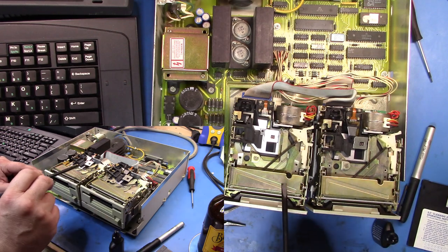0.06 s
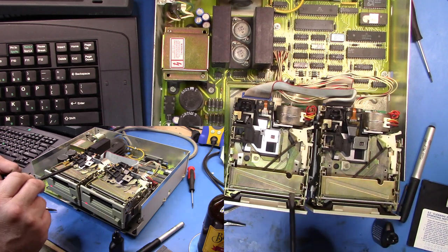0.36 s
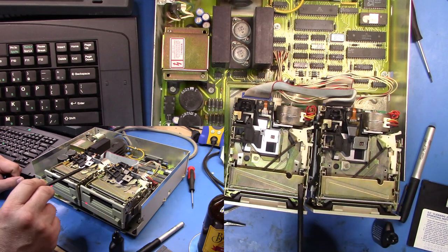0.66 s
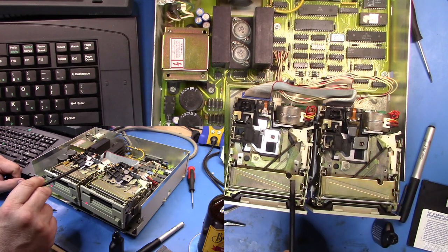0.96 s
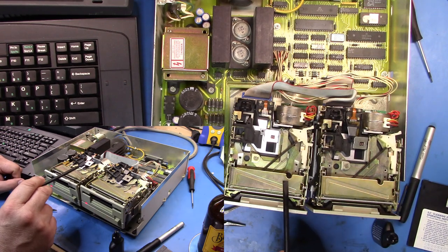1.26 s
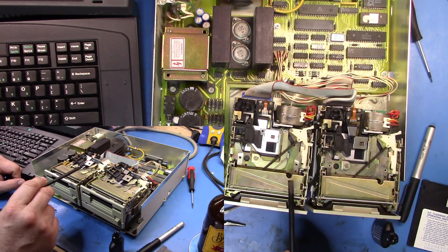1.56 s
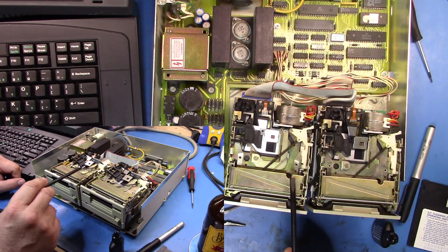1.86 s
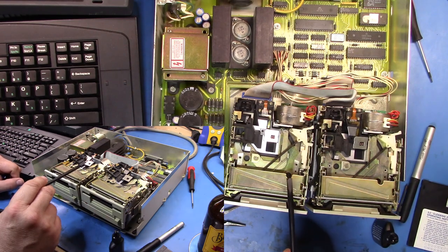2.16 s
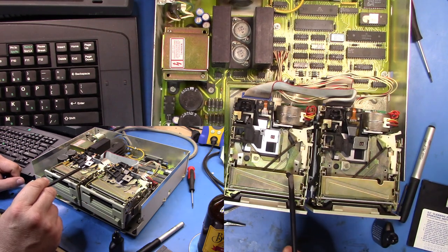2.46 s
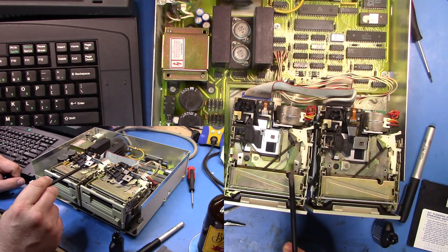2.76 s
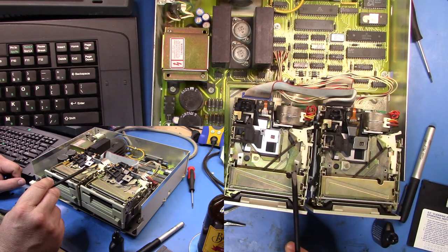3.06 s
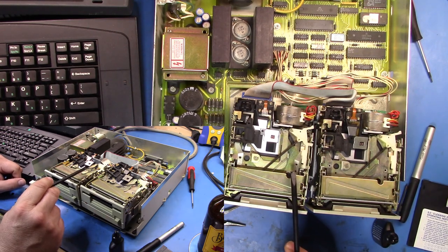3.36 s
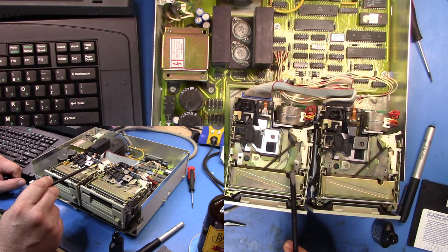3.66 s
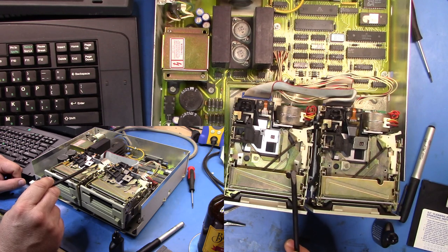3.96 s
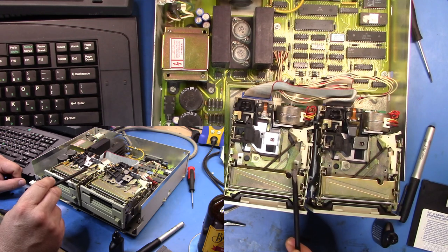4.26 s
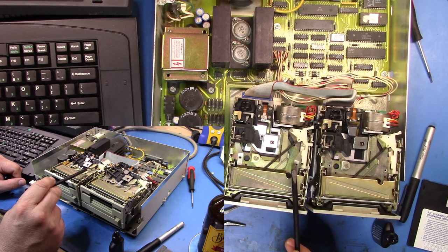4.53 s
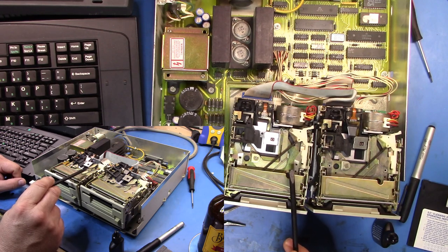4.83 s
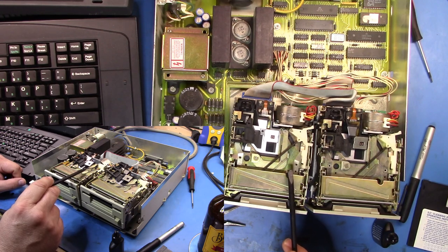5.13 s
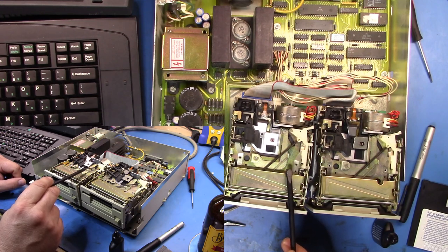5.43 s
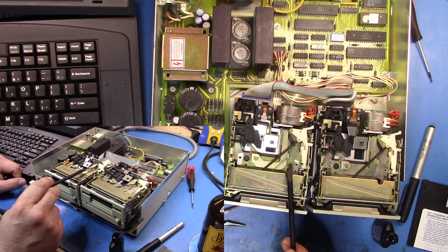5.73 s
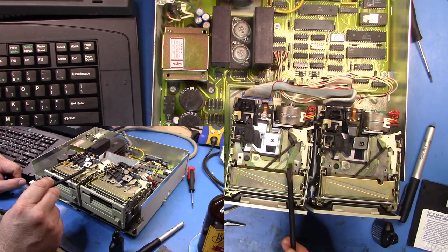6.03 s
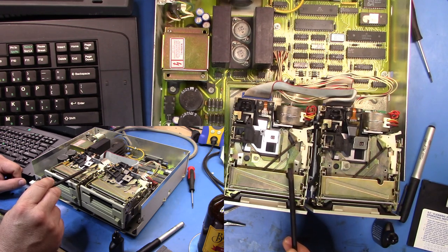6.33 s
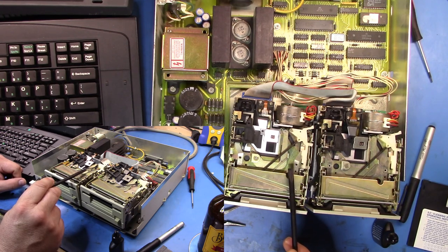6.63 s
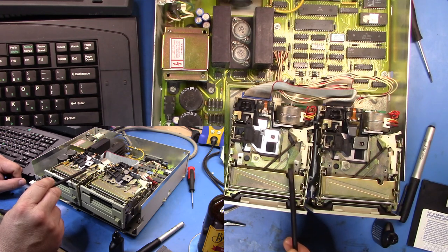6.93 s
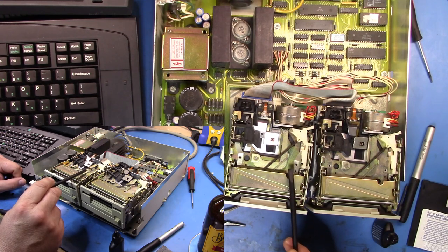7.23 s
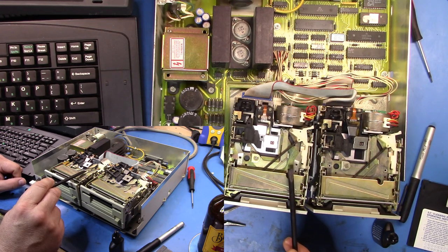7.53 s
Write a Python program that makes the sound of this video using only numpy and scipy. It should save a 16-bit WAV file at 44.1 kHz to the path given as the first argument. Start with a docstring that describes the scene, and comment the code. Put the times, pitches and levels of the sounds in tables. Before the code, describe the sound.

Two floppy drives whine, buzz and swish, stop with a sharp clack, then restart and scrape over a steady fan hum.

```python
"""Two floppy drives on a repair bench

Two open drives run side by side, stop for two seconds and start again. Their motors, a fraction of a
hertz apart, whine and beat while a belt buzzes. The first disk swishes in its sleeve once a turn; the
second scrapes when pressed. Head clamps clack shut and open over a droning case, a fan and mains hum."""
import sys
import numpy as np
from scipy import signal
from scipy.fft import rfft, irfft, next_fast_len
from scipy.io import wavfile
from scipy.ndimage import uniform_filter1d, map_coordinates

SR = 44100
rng = np.random.default_rng(int(sys.argv[2]) if len(sys.argv) > 2 else 0)


def to_wav(s):
    """Save 16-bit WAV."""
    ch = np.atleast_2d(s).T  # columns
    pcm = np.round(np.clip(ch, -1, 1) * 32767)  # PCM
    wavfile.write(sys.argv[1], SR, pcm.astype(np.int16))


N = 343539
T = np.arange(N) / SR
SIDE = np.array([[1], [-1]])  # adds on the left, subtracts on the right
BELT_RATIO, SPIN_UP_S = 4, .064  # shaft turns per disk turn; time to full speed


# The whine of motor A, motor B and the belt pulley. Each row: multiple of the turning rate
# (rounded when played), relative level in dB running free, the same under load.
WHINE_A = [(12, -59, -57), (15, -52.5, -47), (16, -55, -45), (17, -47.5, -39.5), (18, -45.5, -39),
           (21, -63.5, -67), (22, -60.5, -69), (23, -51.5, -47), (24, -54.5, -51), (27, -64.5, -63),
           (41, -58.5, -54)]
WHINE_B = [(5, -61.5, -60), (14, -70, -62.5), (15, -58, -69), (16, -74, -53.5), (17, -74, -61.5),
           (18, -55.5, -46.5), (22, -83, -55), (24, -71, -66), (30, -61, -54.5)]
PULLEY_WHINE = [(94, -69, -50), (154.7, -65.5, -70), (162.2, -69, -71)]

def motor_whine(hz_a, hz_b, load_a, load_b, spin, surge):
    """Two motors beat against each other; the chassis sings out briefly as they reach full speed."""
    whine = harmonics(hz_a, load_a, WHINE_A, flutter=0.0079)
    whine += harmonics(hz_b, load_b, WHINE_B, flutter=0.011)
    whine += harmonics(hz_a / BELT_RATIO, load_a, PULLEY_WHINE, flutter=0.0025)
    whine *= spin ** 6.1 * undb(-1.92 + 9 * surge)
    sing = sum(np.exp(-((T - on - SPIN_UP_S) / 0.0081) ** 2) for on, _ in RUNS)
    return whine + np.sqrt(2) * undb(-29) * sing * np.sin(2 * np.pi * 702 * T)


def harmonics(hz, load, orders, flutter):
    """The tones of one shaft: load shifts their balance and the belt makes them flutter."""
    angle = 2 * np.pi * np.cumsum(hz) / SR + flutter * walk(24)
    out = 0
    for multiple, free_db, loaded_db in orders:
        k = round(multiple)
        db = free_db + load * (loaded_db - free_db) + .55 * walk(15)
        # the chassis delays each harmonic differently, which smears the pulses into a drone
        out += np.sqrt(2) * undb(db) * np.sin(k * angle + 1.15 * k ** 2)
    return out


# Both motors switch together, already running at the start. Each row: on and off in seconds.
RUNS = [(-1, 1.44), (3.668, 9)]
# Motors A and B. Each row: free shaft rate in Hz, clamped rate in Hz, coasting time in seconds.
MOTORS = [(39.56, 39.18, .175), (39.991, 39.6787, .1763)]
# The head clamps. Each row: closing and opening in seconds, drive (0 is A, 1 is B).
CLAMPS = [(.25, 1.44, 0), (-1, 1.44, 1), (5.785, 9, 1)]

def shaft(drive):
    """A closed clamp slows its motor. Gives share of full speed, load (both 0-1) and shaft rate in Hz."""
    free_hz, loaded_hz, coast_s = MOTORS[drive]
    spin = sum(gate(on, off, SPIN_UP_S, coast_s) for on, off in RUNS)
    load = sum(gate(closes, opens, .02, .02) for closes, opens, which in CLAMPS if which == drive)
    return spin, load, spin * (free_hz + load * (loaded_hz - free_hz))


# Belt and bearings, heard through the chassis. Each row: frequency in Hz, relative dB per Hz.
BELT_BUZZ = [(50, -115), (440, -93.5), (570, -79.5), (685, -78.5), (770, -86.5), (910, -76), (1020, -85),
             (1280, -91.5), (1420, -79), (1520, -88), (1660, -81.5), (2000, -92), (2500, -99), (5000, -115)]

def belt_buzz(turns, load_a, load_b, press, spin, surge):
    """The belt buzzes harder on spin-up and against the drag of each clamp and the pressed disk."""
    drag_db = 4 * load_a + 2.5 * load_b + 2.5 * press
    buzz = colour(friction(turns, repeat=.92, spread_db=1), BELT_BUZZ)
    return buzz * (spin ** 2.8 * undb(-2 + drag_db) + np.sqrt(spin) * surge * undb(7.5))


# The disk in its sleeve: airy swish, thin squeak, landing scuff and the ping of a small metal part.
# Each row: frequency in Hz, relative dB per Hz.
SWISH = [(1200, -110), (2300, -101), (3000, -93.5), (3550, -96.5), (3900, -100), (5600, -100.5),
         (6300, -92.5), (7000, -101), (7800, -103), (8800, -96.5), (9800, -102), (10300, -109),
         (11400, -106.5), (12500, -114), (14200, -109), (15500, -114)]
SQUEAK = [(5200, -122), (5900, -101), (6130, -91.5), (6500, -91.5), (6720, -106), (7900, -120),
          (8900, -102), (9700, -101), (10400, -122)]
SCUFF = [(3000, -114), (6300, -106), (6850, -94), (7450, -95), (8000, -103), (9000, -99), (10500, -105),
         (15500, -114)]
PING = [(3000, -125), (3400, -100), (3540, -84.5), (3680, -96), (4100, -125)]

def sleeve_rub(turns, load):
    """Once a turn the warped disk squeaks, lifts clear, lands with a tick and a scuff, and rings metal."""
    since_lift = (turns - 0.863) % 1
    lifted = np.clip(since_lift / .07, 0, 1) * np.clip(1 - (since_lift - 0.22) / 0.033, 0, 1)
    lift_db = -10 * lifted
    squeak_db = -6.5 + lift_db + (14 + 3.5 * walk(10)) * passing(turns, place=0.8, width=0.066)
    dust = undb(-6.5) * grit(per_s=70)
    swish = colour(friction(turns, repeat=0.42, spread_db=2.5) + dust, SWISH)
    swish *= undb(0.65 + lift_db + walk(30))
    squeak = colour(friction(turns, repeat=0.47, spread_db=6.5), SQUEAK)
    squeak *= undb(squeak_db + 0.97 * walk(90))
    scuff = colour(grains(spread_db=2), SCUFF) * passing(turns, place=0.17, width=0.055)
    ping = colour(grains(spread_db=5), PING) * passing(turns, place=.34, width=0.12)
    ping *= undb(2.2 * walk(10))
    tick = colour(grains(spread_db=4), SCRAPE) * passing(turns, place=.125, width=.016)
    tick *= undb(2.5 * walk(10))
    clamp_grip = undb(1.5 * load)  # a closed clamp holds the disk tighter against its sleeve
    return (chassis(swish) + tick + squeak + scuff + ping) * clamp_grip


# Hard contact of the disk, bright and rough. Each row: frequency in Hz, relative dB per Hz.
SCRAPE = [(100, -115), (1700, -89), (2400, -91), (2900, -90.5), (3900, -98), (4700, -92), (5200, -94),
          (6550, -89), (6900, -92), (7320, -89), (7750, -99), (8900, -92.5), (9600, -97), (10070, -91),
          (10450, -93.5), (10650, -100), (11200, -95), (12500, -102), (15500, -107)]

def disk_scrape(turns, press):
    """The pressed disk scrapes, with grit ticking under it."""
    rub = friction(turns, repeat=0.48, spread_db=2.5) * undb(1.5 * walk(130))
    ticks = undb(-2) * grit(per_s=75)
    return chassis(colour(rub + ticks, SCRAPE) * undb(-3.5) * press)


# Presses on disk B. Each row: start and end in seconds.
PRESSES = [(4.075, 5.16), (5.195, 5.8), (5.945, 6.475), (7.05, 9)]

def pressure():
    """1 while the disk is pressed, 0 while it runs free."""
    return sum(gate(start, end, attack_s=0.035, release_s=0.018) for start, end in PRESSES)


def chassis(x):
    """Sheet metal answers friction with a thicket of short, close resonances."""
    t = T[:SR // 20]
    response = rng.standard_normal(len(t)) * undb(-60 * t / 0.037)
    response *= undb(-10) / np.linalg.norm(response)
    response[0] += 1  # the direct sound
    return convolve(x, response)


def rasp(x):
    """The rub shifts colour as the contact point wanders: each band swells and fades on its own."""
    out = 0
    for edge_hz in (4000, 5500, 6900, 8200, 9700, 11500):
        band = signal.sosfiltfilt(signal.butter(6, edge_hz, fs=SR, output="sos"), x)
        out += band * undb(1.1 * walk(45))
        x = x - band
    return out + x


# Clamp clacks, a faint tick and one short scrape of the disk. Each row: start in seconds,
# crack level in dB, crack t60 in seconds, ring level in dB, lever level in dB, low cut in Hz,
# drive (0 is A, 1 is B). Levels are relative.
CLACKS = [(0.2505, -15.5, 0.037, -19, -40, 300, 0), (0.2627, -17, 0.037, -25.5, -41, 380, 0),
          (.277, -36, 0.025, -36, -47, 600, 0), (1.4413, -8.5, 0.026, -24, -14.5, 302, 0),
          (1.4624, -17.5, 0.037, -24.5, -26, 300, 0), (1.467, -33, 0.04, -28, -38, 600, 1),
          (2.049, -44, 0.082, -70, -70, 6500, 1), (5.785, -16.5, 0.022, -39, -45, 350, 1),
          (5.788, -28, 0.031, -22, -40, 150, 1), (5.821, -48, .02, -39, -55, 1000, 1),
          (7.137, -45, 0.063, -70, -40.5, 2000, 1)]
# The crack of loose parts and the bite of the lever. Each row: frequency in Hz, relative dB per Hz.
CRACK = [(200, -26), (500, -4), (1400, 3.5), (2300, -1), (3100, 1.5), (4300, 0.5), (6000, 1), (7600, -1),
         (9700, 3.5), (11500, -4), (15500, -11)]
LEVER = [(1200, -28), (2400, -8), (2750, -1), (3040, 10), (3450, -12), (4600, 0), (5700, -5.5), (7200, 2),
         (8600, -11), (12000, -30)]
# The ring of each drive frame. Each row: pitch in Hz, relative level in dB, t60 in seconds.
FRAME_A = [(350, -13, 0.084), (470, -13, 0.066), (580, -3.5, 0.12), (691, -7, 0.1), (837, -8, 0.08),
           (1094, -14, 0.08), (1358, -4, 0.062), (1407, 0, 0.052), (1602, -7, 0.07), (1700, -10, .06),
           (2000, -10, 0.065), (2150, -12, .05)]
FRAME_B = [(280, -8.5, 0.057), (345, -10.5, 0.058), (563, -4, 0.05), (625, -7, .05), (730, -8, 0.074),
           (847, 0.5, 0.1), (1143, -3.5, 0.057), (1290, -11.5, 0.1), (1390, -8, 0.056), (1615, -4.5, 0.06),
           (1650, -4, 0.067), (5700, -18, .06), (9050, -18, 0.07), (9690, -24, .06)]

def clacks():
    """Each contact is a short crack of loose small parts, a bite from the lever and a ring of the frame."""
    out = np.zeros(N)
    rattle = colour(rng.standard_normal(N), CRACK)
    lever = colour(rng.standard_normal(N), LEVER)
    t = T[:SR // 2]
    for start, crack_db, crack_t60, ring_db, lever_db, cut_hz, drive in CLACKS:
        span = slice(int(start * SR), int(start * SR) + len(t))
        ring = sum(undb(db - 60 * t / t60) * np.sin(2 * np.pi * (hz * t + rng.random()))
                   for hz, db, t60 in (FRAME_B if drive else FRAME_A))
        crack = rattle[span] / rattle.std() * undb(crack_db - 60 * t / crack_t60)
        bite = lever[span] / lever.std() * undb(lever_db - 60 * t / 0.054)
        # the frame takes longer to get moving than the small parts
        hit = (crack + bite) * (1 - np.exp(-t / 0.00094))
        hit += undb(ring_db) * ring * (1 - np.exp(-t / 0.0024))
        out[span] += signal.sosfilt(signal.butter(3, cut_hz, "high", fs=SR, output="sos"), hit)
    return out


def drives(press):
    """Both drives turning: the shaft speeds set the whine, the buzz and the rub of the disks."""
    spin, load_a, hz_a = shaft(0)
    _, load_b, hz_b = shaft(1)
    turns_a, turns_b = (.323 + np.cumsum(hz) / SR / BELT_RATIO for hz in (hz_a, hz_b))
    # full current while spinning up, cut back as soon as the speed is reached
    surge = sum(gate(on, on + SPIN_UP_S, attack_s=0.0075, release_s=0.01) for on, _ in RUNS)
    whine = motor_whine(hz_a, hz_b, load_a, load_b, spin, surge)
    buzz = belt_buzz(turns_a, load_a, load_b, press, spin, surge)
    rub = sleeve_rub(turns_a, load_a) + disk_scrape(turns_b, press)
    return whine + buzz + rasp(rub) * spin ** 2


# The lowest resonance of the case. Each row: frequency in Hz, relative dB per Hz.
CASE_DRONE = [(110, -110), (127, -71), (134, -56), (141, -70), (170, -105)]

def case_drone(press):
    """The sheet-metal case drones low, and louder when the pressed disk feeds it."""
    return colour(rng.standard_normal(N), CASE_DRONE) * undb(-13.5 + 6 * press)


# The noise bed: fan rush, its thin whistle, and the room air that differs between the ears.
# Each row: frequency in Hz, relative dB per Hz.
FAN_RUSH = [(25, -102), (90, -89.5), (130, -81.5), (160, -81), (210, -77), (400, -76.5), (500, -81),
            (720, -81), (1000, -85.5), (2000, -92.5), (4000, -102), (8000, -106), (12000, -110),
            (15500, -118)]
FAN_WHISTLE = [(5700, -125), (6230, -105), (6350, -100.5), (6470, -108), (6900, -130), (10800, -130),
               (11100, -105), (11400, -130)]
ROOM_AIR = [(30, -102), (90, -102), (140, -90), (400, -91), (1000, -98), (4000, -112), (8000, -121),
            (15000, -130)]
# Mains and fan tones. Each row: pitch in Hz, average level in dB.
HUM = [(120, -58), (240, -61), (269.2, -60), (334, -61.5), (349.5, -55), (403.7, -56.5), (538.3, -63.5),
       (698.8, -61), (1398, -69.5), (1680, -76), (6360, -78), (11090, -95)]

def fan_and_hum():
    """A fan rushes and whistles a little to the left, with wavering tones of fan and transformer."""
    rush = colour(rng.standard_normal(N), FAN_RUSH) * undb(0.75 * walk(9))
    whistle = colour(rng.standard_normal(N), FAN_WHISTLE)
    air = colour(rng.standard_normal(N), ROOM_AIR)
    hum = 0
    for hz, db in HUM:
        level = np.sqrt(2) * undb(db + 0.75 * walk(5))
        hum += level * np.sin(2 * np.pi * (hz * T + rng.random()) + 0.097 * walk(4))
    return (rush + whistle + hum) * undb(0.28 * SIDE) + air * SIDE


def workshop(x, t60, wet_db, width):
    """A small room adds a diffuse tail, nearly alike in both channels."""
    t = T[:SR // 2]
    tails = rng.standard_normal((2, len(t))) * undb(-60 * t / t60) * (1 - np.exp(-t / 0.0042))
    tails = signal.sosfilt(signal.butter(1, 9000, fs=SR, output="sos"), tails)
    mid, side = (convolve(x, tail) for tail in tails)
    return x + undb(wet_db) * (mid + width * side * SIDE)


def treble_spread(x, gain_db):
    """A faint scattered treble difference between left and right widens the sound."""
    scattered = convolve(x, rng.standard_normal(SR // 500))
    treble = signal.sosfilt(signal.butter(1, 6500, "high", fs=SR, output="sos"), scattered)
    return undb(gain_db) * treble * SIDE


def friction(turns, repeat, spread_db):
    """A rotating surface: bumps that return every turn carry the repeat share of power, the rest is new."""
    bumps = grains(spread_db)[:4400]
    locked = map_coordinates(bumps, [turns % 1 * len(bumps)], order=3, mode="grid-wrap")
    return np.sqrt(repeat) * locked / locked.std() + np.sqrt(1 - repeat) * grains(spread_db)


def grains(spread_db):
    """White friction noise of unit power, made of tiny contacts of uneven but bounded size."""
    x = rng.standard_normal(N) * undb(spread_db * np.minimum(walk(1500), 2))
    return x / x.std()


def grit(per_s, spread_db=3, decay_s=0.0016):
    """Sparse ticks of uneven size, white and of unit power."""
    ticks = (rng.random(N) < per_s / SR) * undb(spread_db * np.minimum(rng.standard_normal(N), 1))
    x = signal.lfilter([1], [1, -np.exp(-1 / (decay_s * SR))], ticks) * rng.standard_normal(N)
    return x / x.std()


def passing(turns, place, width):
    """Swells to 1 each time a spot on the disk comes round; place and half width are in turns."""
    return np.exp(-(((turns - place + .5) % 1 - .5) / width) ** 2)


def gate(start, end, attack_s, release_s):
    """Rises to 1 from the start, holds, and falls to 0 after the end."""
    return np.clip((T - start) / attack_s, 0, 1) * np.clip(1 - (T - end) / release_s, 0, 1)


def walk(rate):
    """A smooth random drift with a spread near 1, changing rate times a second."""
    step = int(SR / rate)
    return np.sqrt(2) * uniform_filter1d(np.repeat(rng.standard_normal(N // step + 1), step), step)[:N]


def colour(x, spectrum):
    """Gives white noise of unit power a (Hz, dB per Hz) spectrum."""
    hz, db = np.transpose(spectrum)
    size = next_fast_len(N)
    bins = np.maximum(np.fft.rfftfreq(size, 1 / SR), 1)
    gain = undb(np.interp(np.log(bins), np.log(hz), db)) * np.sqrt(SR / 2)
    return irfft(rfft(x, size) * gain, size)[:N]


def convolve(x, response):
    """Plays x through an impulse response scaled to unit energy."""
    return signal.fftconvolve(x, response / np.linalg.norm(response))[:N]


def undb(db):
    """Decibels to gain."""
    return 10 ** (np.asarray(db) / 20)


def scene():
    """Drives and clacks up close, over the case, the fan and the hum."""
    press = pressure()
    running, hits = drives(press), clacks()
    mix = running + case_drone(press) + workshop(hits, t60=0.25, wet_db=-14, width=0.12)
    mix += treble_spread(running, gain_db=-27) + treble_spread(hits, gain_db=-16)
    return mix + fan_and_hum()


def record(dry):
    """A steep low-pass cuts the top above 15.8 kHz."""
    return signal.sosfilt(signal.ellip(10, .2, 70, 15800, fs=SR, output="sos"), dry)


dry = scene()
out = record(dry)
to_wav(out)
```